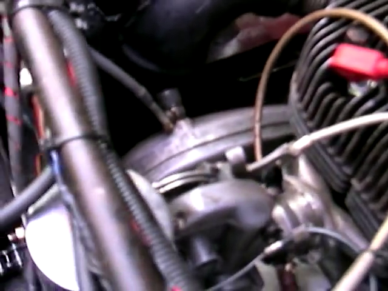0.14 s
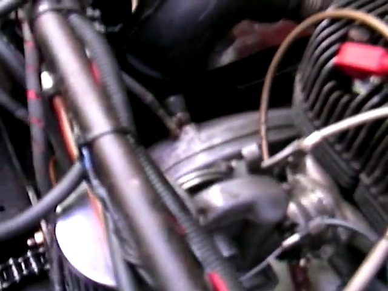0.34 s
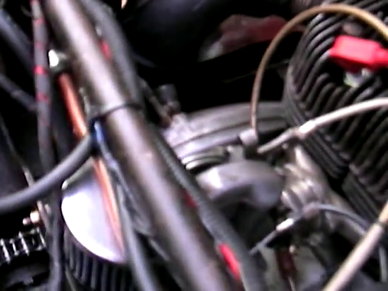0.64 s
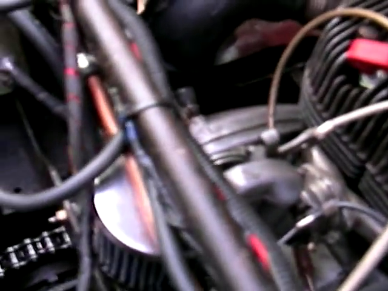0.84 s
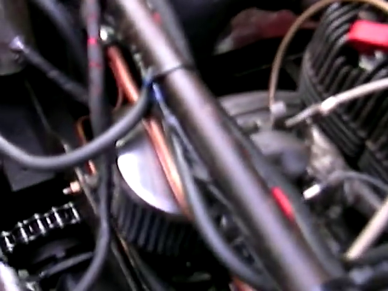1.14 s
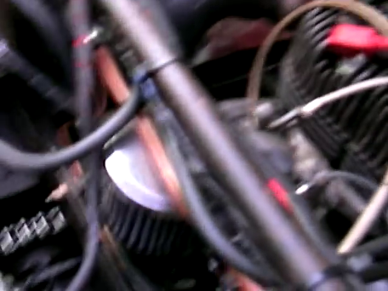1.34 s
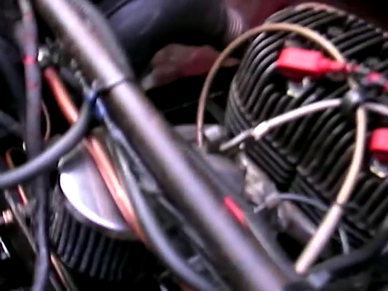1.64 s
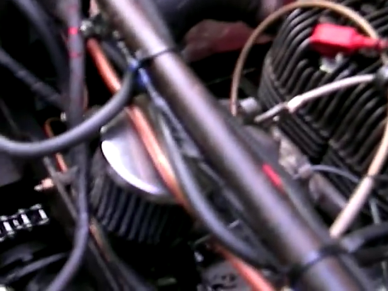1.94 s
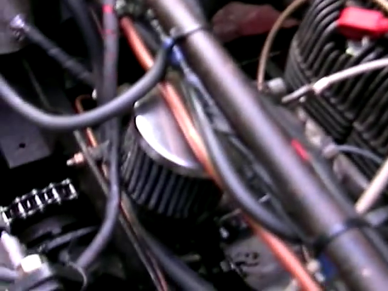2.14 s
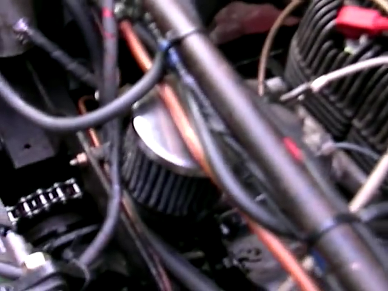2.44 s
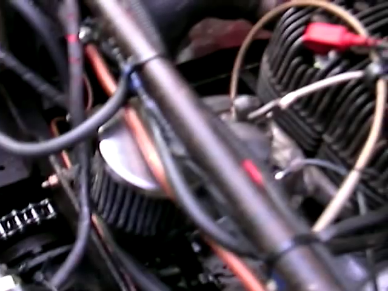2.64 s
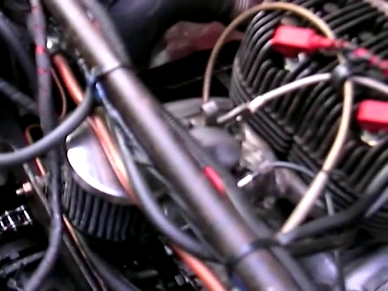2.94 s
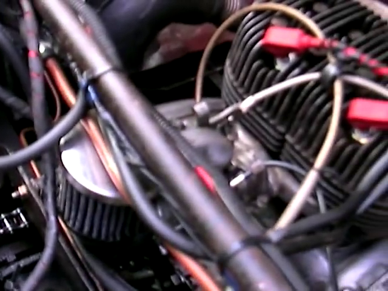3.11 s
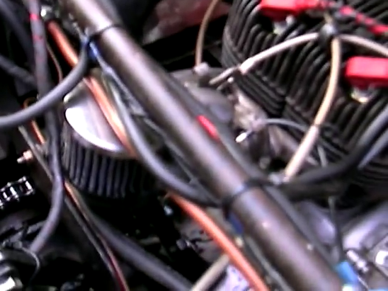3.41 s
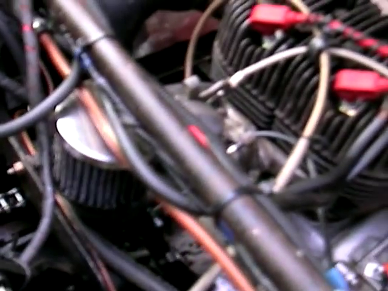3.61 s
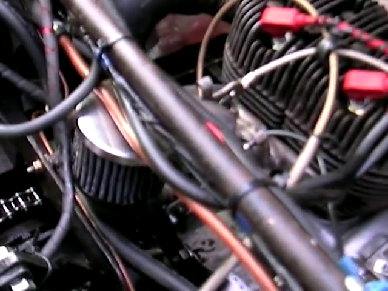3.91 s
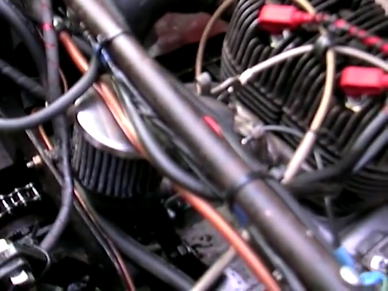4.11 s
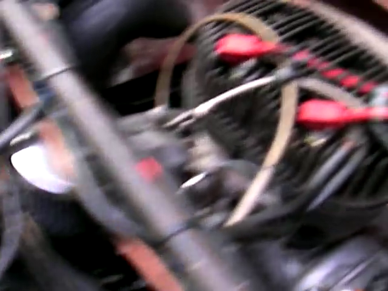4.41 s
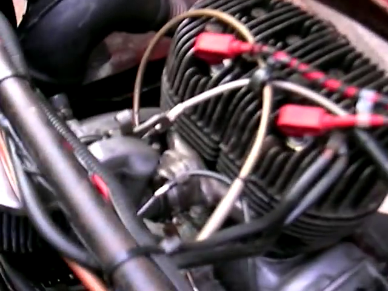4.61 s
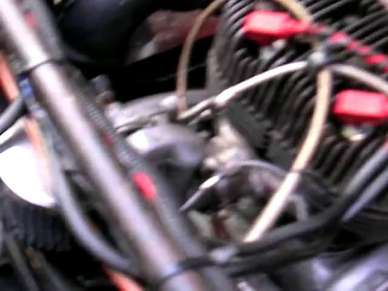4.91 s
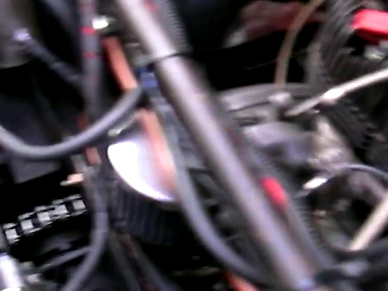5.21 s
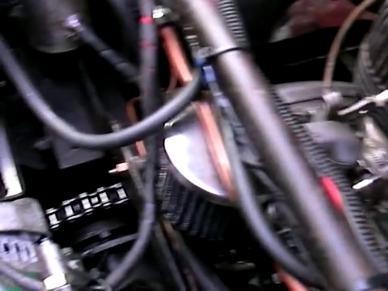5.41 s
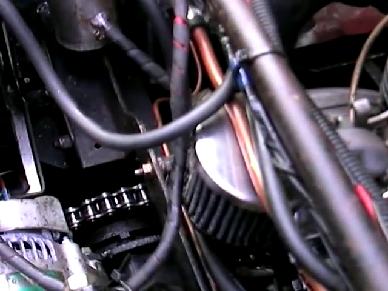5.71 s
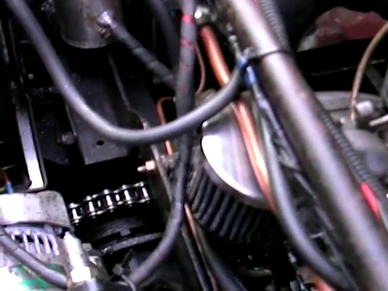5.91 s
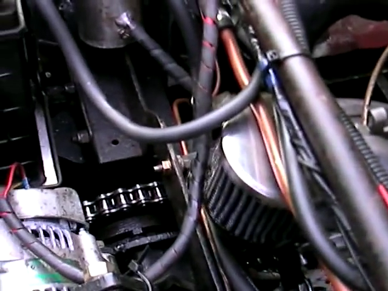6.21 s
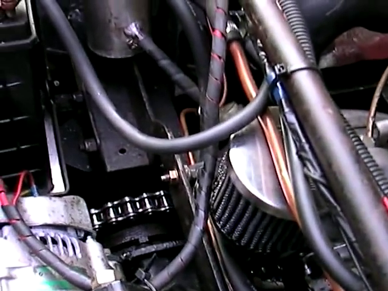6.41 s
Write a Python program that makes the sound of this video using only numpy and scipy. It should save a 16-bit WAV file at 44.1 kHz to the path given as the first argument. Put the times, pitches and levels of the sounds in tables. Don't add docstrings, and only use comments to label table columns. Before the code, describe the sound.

Continuous engine idle from start to finish, with no revving or stop. Dry metallic chatter from pistons, chain, gears and fins fills the middle and treble. Over it comes a loping pulse of brief, high gas spits, roughly four a second at first, then nearly six, each followed by low, hollow pipe booms. A steady breathy air rush lies beneath. The close handheld microphone shifts, hiss often leaning right, with faint reflections from garage walls and a limited top end.

```python
import sys
import numpy as np
from scipy import signal
from scipy.fft import rfft, irfft, next_fast_len
from scipy.io import wavfile
from scipy.ndimage import uniform_filter1d

SR = 44100
rng = np.random.default_rng(int(sys.argv[2]) if len(sys.argv) > 2 else 0)


def wrap_up_sound(samples):
    columns = np.atleast_2d(samples).T
    tamed = np.clip(columns, -1, 1)
    steps = np.round(tamed * 32767).astype(np.int16)
    wavfile.write(sys.argv[1], SR, steps)


def convert_level_to_amplitude(level_db):
    exponent = np.asarray(level_db, float) / 20
    return 10 ** exponent


N = 288855

# [t/s, turns done]
CRANK_PROGRESS = [(-.047, 0), (.357, 8), (.563, 12), (.7767, 16), (.9398, 19), (1.2791, 25), (1.626, 31),
                  (1.9703, 37), (2.4877, 46), (2.6657, 49), (3.015, 55), (3.3673, 61), (3.8935, 70),
                  (4.2444, 76), (4.7668, 85), (5.4605, 97), (6.681, 118)]
# [t/s, hiss over the rule/dB, boom strength/dB]
ODD_CATCHES = [(0.563, -2.5, 2.5), (0.9405, 6, 1), (1.626, -4.5, 1), (2.1489, -0.5, -0.5), (3.1954, 1, 2),
               (3.3677, 2, 2.5), (4.0718, 0, 2.5), (4.4186, 2, -1.5), (4.593, 3.5, 0.5), (5.6371, -3.5, 0),
               (5.8127, -2, 0.5), (6.5074, -0.5, 2.5)]
# [t/s, hiss peak level/dB, hiss left-right/dB, nearness to the heads/dB]
MICROPHONE_VIEW = [
    (0, -12, 1, 2.5),
    (1.0, -12, -4, 0.5),
    (2.2, -11.5, -3, -0.1),
    (3.2, -13, -0.7, 2),
    (4.1, -13, -2, 0),
    (4.7, -13.5, -1.5, 3),
    (5.2, -11.5, -3, 0.5),
    (6.55, -15, -2, 0.5),
]
# [t/s, level/dB]
LOAD = [
    (0.0, -0.5),
    (0.62, 0),
    (1.0, 1.2),
    (2.0, 0.5),
    (3.7, 0.5),
    (5.2, 0),
    (6.42, 1.5),
    (6.55, 2.5),
]
# [turns after the catch, length/turns, f/Hz, level/dB]
BOOMS_THREE = [(.1, 1, 94, 1.5), (.95, 0.98, 87.3, 0.5), (1.45, 1, 85.4, 0), (1.9, 0.99, 88.9, -1),
               (2.45, 0.98, 85.5, -1.5), (.68, 1.0, 159, 8), (1.15, 1, 157.7, 8.5), (2.24, 0.51, 156.4, 3),
               (3.08, 0.75, 155.7, 9), (.4, 0.71, 223, 7.5), (.62, 0.57, 226, 0.5), (1.6, 0.47, 230.2, 3.5),
               (1.95, 0.19, 228, -3), (2.55, 0.5, 231.3, 2.5)]
# [turns after the catch, length/turns, f/Hz, level/dB]
BOOMS_FOUR = [(0.79, 1.7, 77, 1.5), (2.45, 3.3, 91, 2.5), (3.44, 1.2, 110, 1.5), (0.67, 0.86, 150, -8),
              (2, 2.8, 157, 2), (2.96, 2.2, 180, 3.5), (0.59, 0.93, 230, 9.5), (1.33, 0.6, 170, 5),
              (2.2, 0.44, 69, -5)]
# [f/Hz, width/Hz, level/dB]
COVER = [(728, 126, -3), (1098.6, 33, 4), (1320, 130, -19.5), (1376, 25, 5)]
CRANKCASE = [(1616, 88, -10), (1754, 64, 6), (1866, 28, 9), (2135, 80, 0.5)]
FINS = [(2240, 25, 4), (2396, 66, -2), (2462, 51, 13.5), (2624, 114, 6), (2770, 79, 12.5), (2940, 32, 2),
        (3125, 36, 5), (3400, 17, 2)]
HEADS = [(3800, 14, 2), (3894, 15, 5.5), (4175, 40, 5.5), (4326, 170, -0.5), (4670, 36, 3.5),
         (4784, 17, -4), (5020, 50, -3), (5050, 70, -4), (5160, 51, 0), (5416, 100, -4)]
HEAD_FINS = [(6050, 230, 2), (6440, 57, 9), (6200, 58, 7.5), (6350, 125, 0.5), (6500, 34, 11),
             (7530, 54, -20)]
# [share of turn, fall by 60 dB/s, level on first turn/dB, on second/dB, on later ones/dB]
COVER_KNOCKS = [(.88, 0.16, 6.5, 2.5, 6.9)]
CRANKCASE_KNOCKS = [(.17, 0.077, 9.2, 3, 11.5), (.62, 0.046, 3.6, 4.3, 4), (.94, 0.066, 13, 2, -27)]
FIN_KNOCKS = [(.17, 0.02, 8, 4, 5.6), (.37, 0.021, -8.5, -10, 3.2), (.65, 0.036, -7, -1.5, 0.83)]
HEAD_KNOCKS = [(.11, 0.034, 3.6, 7.1, 6.7), (.6, 0.038, 11.5, 11, 11.3)]
HEAD_FIN_KNOCKS = [(.2, 0.011, 3.8, 14, 4.6), (.62, 0.055, 14.3, 16.2, 19.8)]
# [f/Hz, likeness from 0 to 1]
LIKENESS = [(60, 0.41), (180, 0.96), (530, 1), (1570, 1), (4660, 0.56), (13800, 0.17)]
# [f/Hz, left-right/dB]
LEAN = [(60, -10), (230, -0.5), (910, 0.5), (3550, -4.5), (13800, -5.5)]
# [f/Hz, level per Hz/dB]
AIR_SPECTRUM = [(18, -48), (30, -17.5), (152, 3), (241, -1), (354, -16), (470, -15.5), (1220, -26.5),
                (1700, 0.5), (2440, -5), (3580, -14), (6310, -24), (7950, -2), (8810, -20), (12000, -45),
           (14000, -53)]

FOUR_TURN_ROUNDS_END = 16
GARAGE_T60_S, WALL_CUT_HZ = 0.29, 1300
LOWEST_PIPE_HZ, UPPER_PIPE_HZ = 110, 190
UPPER_SAG = 0.27
PIPE_WANDER_DB, PIPE_WANDER, BOOM_WANDER_DB = 1.2, 0.012, 0.8
HISS_HZ, HISS_WANDER_HZ = 11380, 300
HISS_WANDER_DB, HISS_WANDER_PAN_DB = 0.7, 1.1
LEAD_S = 0.009
HEAD_SLIP = 0.021
METAL_DB, HEADS_DB, HEAD_FINS_DB, AIR_DB = -14.5, -18, -22, -21
HEADS_FOLLOW, AIR_FOLLOWS = 0.23, 0.32
DUCK_FROM_DB, DUCK_SHARE, DUCK_RELEASE_S = -25, 0.35, 0.014
TOP = 0.84
CUTOFF_HZ = 13560
DROPPED_LOW_HZ, DROPPED_HIGH_HZ = 7650, 8250
DROPPED_SHARE, DROP_S = 0.5, 0.025


def rms_one(x):
    return x / np.sqrt(np.mean(x ** 2) + 1e-20)


def at_hz(points, hz):
    table = np.array(points)
    return np.interp(np.log(hz), np.log(table[:, 0]), table[:, 1])


def band(x, low_hz, high_hz):
    edges_hz = [low_hz, min(high_hz, 0.45 * SR)]
    return signal.sosfilt(signal.butter(2, edges_hz, "band", fs=SR, output="sos"), x)


def spread(mid, side, hz, lag=0):
    alike = np.clip(at_hz(LIKENESS, hz), 0, 1)
    lean_db = at_hz(LEAN, hz)
    shared = np.sqrt(1 + alike) * mid
    different = np.sqrt(1 - alike) * side
    left = convert_level_to_amplitude(lean_db / 2) * (shared + different)
    right = convert_level_to_amplitude(-lean_db / 2) * (shared - different)
    return np.array([left, np.roll(right, lag)])


def dying(at_s, db, rise_s, t60):
    kicks = np.full(N, 1e-18)
    inside = (at_s >= 0) & (at_s < (N - 1) / SR)
    np.add.at(kicks, (at_s[inside] * SR).astype(int), convert_level_to_amplitude(db[inside]))
    fall = convert_level_to_amplitude(-60 / (t60 * SR))
    rise = np.exp(-1 / (rise_s * SR))
    return signal.lfilter([1 - rise], np.convolve([1, -fall], [1, -rise]), kicks)


def rounds():
    s, done = np.transpose(CRANK_PROGRESS)
    firing = np.r_[0:FOUR_TURN_ROUNDS_END:4, FOUR_TURN_ROUNDS_END:done[-1] + 1:3]
    starts = np.interp(firing, done, s)
    for at_s, *_ in ODD_CATCHES:
        starts[np.argmin(abs(starts - at_s))] = at_s
    turns = np.diff(firing)
    return starts[:-1], turns, np.diff(starts) / turns


def oddness(order, wander_db):
    starts = rounds()[0]
    db = wander_db * rng.standard_normal(len(starts))
    for row in ODD_CATCHES:
        db[np.argmin(abs(starts - row[0]))] = row[order]
    return db


def garage(x):
    size = next_fast_len(N + SR)
    one_sample = np.exp(-2j * np.pi * np.arange(size // 2 + 1) / size)
    dull = np.exp(-2 * np.pi * WALL_CUT_HZ / SR)
    wall = (1 - dull) / (1 - dull * one_sample)
    out, source = np.zeros((2, N)), rfft(x, size)
    lags = (rng.uniform(0.012, 0.035, 16) * SR).astype(int)
    for k, lag in enumerate(lags):
        loop = convert_level_to_amplitude(-60 * lag / SR / GARAGE_T60_S) * wall * one_sample ** lag
        echoes = irfft(source * loop / (1 - loop), size)[:N]
        out[k % 2] += echoes * (-1) ** (k // 2)
    return out


def air():
    out, edges = 0, 25 * 2 ** np.arange(0, 9.4, 1 / 3)
    white = rng.standard_normal((2, 2, N))
    for k, (low, high) in enumerate(zip(edges, edges[1:])):
        hz = np.sqrt(low * high)
        level = convert_level_to_amplitude(at_hz(AIR_SPECTRUM, hz))
        out = out + level * spread(*band(white[k % 2], low, high), hz)
    return rms_one(out)


def exhaust(wander_db, wander_hz):
    out, t = np.zeros(N), np.arange(N) / SR
    strengths = oddness(order=2, wander_db=BOOM_WANDER_DB)
    for start, turns, turn_s, strength_db in zip(*rounds(), strengths):
        pitch = 1 + wander_hz * rng.standard_normal()
        booms = BOOMS_FOUR if turns > 3 else BOOMS_THREE
        for after, length, hz, db in booms:
            middle, half = start + after * turn_s, length * turn_s / 2
            part = slice(max(0, int((middle - half) * SR)), max(0, int((middle + half) * SR)))
            from_middle = t[part] - middle
            swell = np.cos(np.pi / 2 * from_middle / half) ** 2
            sag = UPPER_SAG * (hz > UPPER_PIPE_HZ) * from_middle ** 2 / (2 * half)
            level_db = db + strength_db * (hz > LOWEST_PIPE_HZ) + wander_db * rng.standard_normal()
            tone = np.cos(2 * np.pi * hz * pitch * (t[part] - start - sag))
            out[part] += convert_level_to_amplitude(level_db) * swell * tone
    return rms_one(out)


def joint_hiss(width_hz):
    out = np.zeros((2, N))
    starts = rounds()[0]
    s, peak_db, pan_db, _ = np.transpose(MICROPHONE_VIEW)
    peaks = np.interp(starts, s, peak_db) + oddness(order=1, wander_db=HISS_WANDER_DB)
    chance = rng.standard_normal((len(starts), 2))
    pans = np.interp(starts, s, pan_db) + HISS_WANDER_PAN_DB * chance[:, 0]
    pitches = HISS_HZ + HISS_WANDER_HZ * chance[:, 1]
    for at_s, db, pan, hz in list(zip(starts, peaks, pans, pitches))[1:]:
        first = int((at_s - LEAD_S) * SR)
        t = np.arange(min(SR // 6, N - first)) / SR
        since = np.maximum(t - LEAD_S, 0)
        leak = convert_level_to_amplitude(-10) * (t < LEAD_S) * t / LEAD_S
        fall = convert_level_to_amplitude(-60 * since / 0.057) + convert_level_to_amplitude(-19.5 - 60 * since / 0.17)
        burst = (1 - np.exp(-since / 0.00044)) * fall + leak
        splutter = convert_level_to_amplitude(2.5 * rms_one(band(rng.standard_normal(len(t)), 150, 1100)))
        jet = band(rng.standard_normal((2, len(t))), hz - width_hz, hz + width_hz)
        mid, side = band(jet, hz - 1.9 * width_hz, hz + 1.5 * width_hz)
        lean = convert_level_to_amplitude(db + pan / 2 * np.array([[1], [-1]]))
        hiss = burst * splutter * (mid + 0.5 * side * [[1], [-1]])
        out[:, first:first + len(t)] += lean * rms_one(hiss) * np.sqrt(np.mean(burst ** 2))
    return out


def metal(modes, knocks, broad_db, grit, rise_s, slip=0.0, top_db=None):
    starts, turns, turn_s = rounds()
    counts = turns.astype(int)
    which = np.repeat(np.arange(len(starts)), counts)
    turn = np.concatenate([np.arange(count) for count in counts])
    shifts = 0.0008 * rng.standard_normal((len(knocks), len(turn)))
    forces = 0.9 * rng.standard_normal((len(knocks), len(turn)))
    grain_db = grit * np.minimum(rng.exponential(1, N), 6)
    grains = rng.standard_normal((2, N)) * convert_level_to_amplitude(grain_db)

    def rattle(own_db):
        drive = np.ones(N)
        for (share, t60, *db), shift, force in zip(knocks, shifts, forces):
            at_s = starts[which] + (turn + share + slip * turn) * turn_s[which] + shift
            chance_db = own_db * rng.standard_normal(len(turn))
            level_db = np.array(db)[np.minimum(turn, 2)] + force + chance_db
            drive += dying(at_s, level_db, rise_s, t60)
        return drive * grains

    low_hz, high_hz = modes[0][0] * 0.76, modes[-1][0] * 1.374
    plain = rattle(0)
    broad = spread(*band(plain, low_hz, high_hz), np.sqrt(low_hz * high_hz))
    out = convert_level_to_amplitude(broad_db) * rms_one(broad)
    if top_db is not None:
        out += convert_level_to_amplitude(top_db) * rms_one(spread(*band(plain, 7200, 11970), 7200))
    rung = 0
    for hz, width, db in modes:
        r = np.exp(-np.pi * abs(width) / SR)
        gain = [(1 - r * r) / 2, 0, (r * r - 1) / 2]
        feedback = [1, -2 * r * np.cos(2 * np.pi * hz / SR), r * r]
        ring = signal.lfilter(gain, feedback, rattle(1.3))
        rung = rung + convert_level_to_amplitude(db) * spread(*ring, hz, lag=rng.integers(-2, 3))
    return rms_one(out + rms_one(rung))


def scene():
    t = np.arange(N) / SR
    load_db = np.interp(t, *np.transpose(LOAD))
    view = np.array(MICROPHONE_VIEW)
    near_db = np.interp(t, view[:, 0], view[:, 3])
    booms = convert_level_to_amplitude(-22.5) * exhaust(wander_db=PIPE_WANDER_DB, wander_hz=PIPE_WANDER)
    cover = convert_level_to_amplitude(-15) * metal(COVER, COVER_KNOCKS, broad_db=-1.5, grit=0.47, rise_s=0.0066)
    crankcase = convert_level_to_amplitude(-7.5) * metal(CRANKCASE, CRANKCASE_KNOCKS, broad_db=-22.5, grit=0.41, rise_s=0.00043)
    fins = convert_level_to_amplitude(-1.0) * metal(FINS, FIN_KNOCKS, broad_db=-25, grit=1.7, rise_s=0.00074)
    clatter = convert_level_to_amplitude(METAL_DB + load_db) * (cover + crankcase + fins)
    heads = metal(HEADS, HEAD_KNOCKS, broad_db=-1.5, grit=2.4, rise_s=0.00096, slip=HEAD_SLIP, top_db=-7)
    clatter += convert_level_to_amplitude(HEADS_DB + HEADS_FOLLOW * load_db + near_db) * heads
    head_fins = metal(HEAD_FINS, HEAD_FIN_KNOCKS, broad_db=-4.0, grit=0.99, rise_s=0.0004, slip=HEAD_SLIP)
    clatter += convert_level_to_amplitude(HEAD_FINS_DB + HEADS_FOLLOW * load_db) * head_fins
    near = booms + clatter + convert_level_to_amplitude(2.0) * joint_hiss(width_hz=1000)
    echo = convert_level_to_amplitude(-23.5) * garage(near.mean(axis=0))
    return near + echo + convert_level_to_amplitude(AIR_DB + AIR_FOLLOWS * load_db) * air()


def dropouts(x):
    hz = np.arange(N // 2 + 1) * SR / N
    weak = irfft(rfft(x) * ((hz > DROPPED_LOW_HZ) & (hz < DROPPED_HIGH_HZ)), N)
    level = uniform_filter1d(np.mean(weak ** 2, axis=0), size=int(DROP_S * SR))
    faint = level < np.quantile(level, DROPPED_SHARE)
    off = uniform_filter1d(1.0 * faint, size=300)
    return x - off * weak


def roll_off(x):
    return signal.sosfilt(signal.butter(12, 14450, fs=SR, output="sos"), x)


def record(dry):
    hold = np.exp(-1 / (DUCK_RELEASE_S * SR))
    treble_power = np.mean(band(dry, 9500, 13500) ** 2, axis=0)
    treble = signal.lfilter([1 - hold], [1, -hold], treble_power)
    excess_db = np.maximum(10 * np.log10(treble + 1e-12) - DUCK_FROM_DB, 0)
    ducked = dry * convert_level_to_amplitude(-DUCK_SHARE * excess_db)
    rounded = TOP * np.tanh(ducked / TOP)
    notch_hz, wide, deep = 7900, 0.88, 0.99
    c = -2 * np.cos(2 * np.pi * notch_hz / SR)
    hollow = signal.lfilter([1, c * deep, deep ** 2], [1, c * wide, wide ** 2], rounded)
    cut = signal.sosfilt(signal.cheby2(16, 40, CUTOFF_HZ * 1.015, fs=SR, output="sos"), hollow)
    finished = dropouts(cut)
    return roll_off(finished)


dry = scene()
out = record(dry)
wrap_up_sound(out)
```